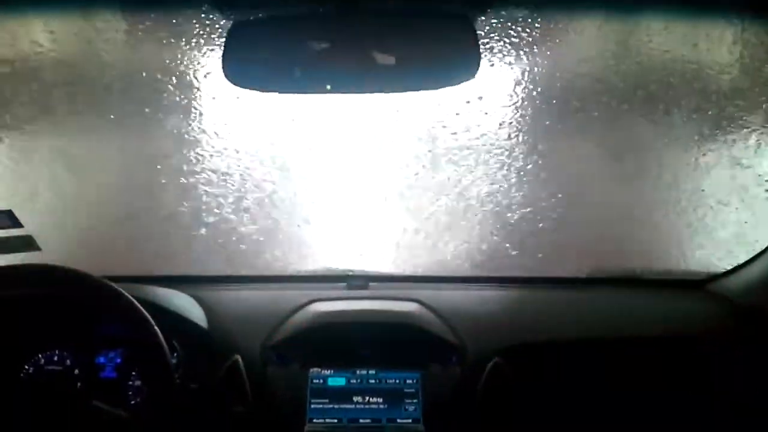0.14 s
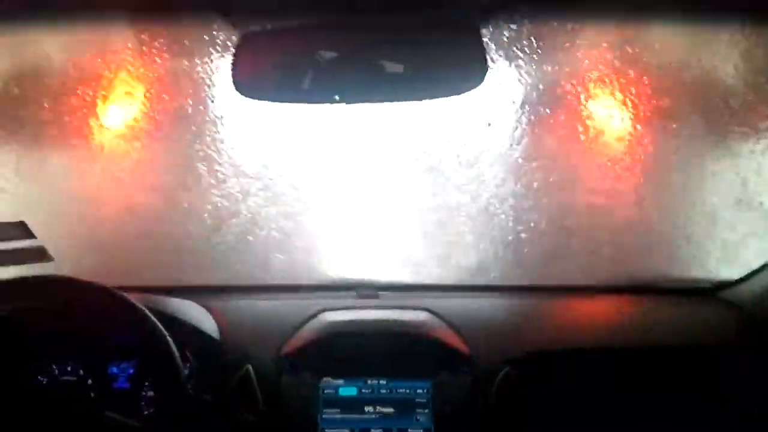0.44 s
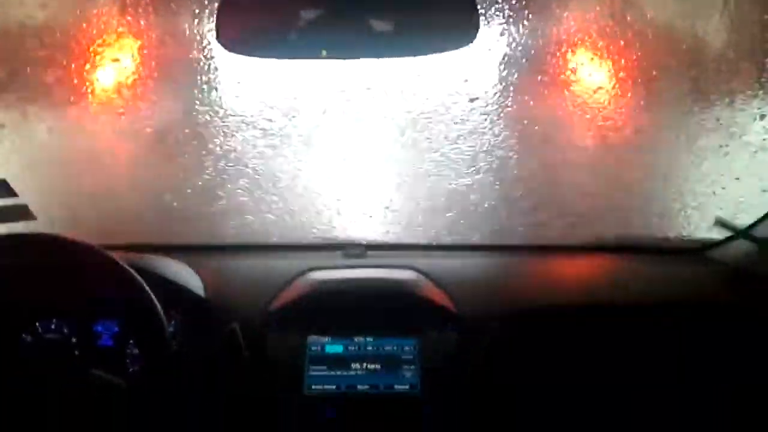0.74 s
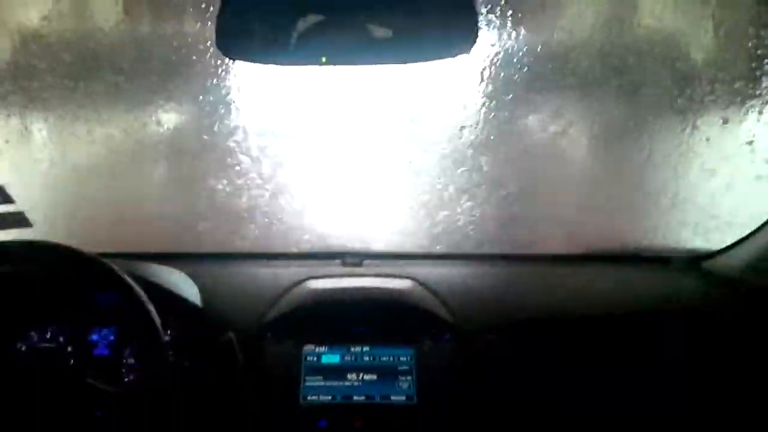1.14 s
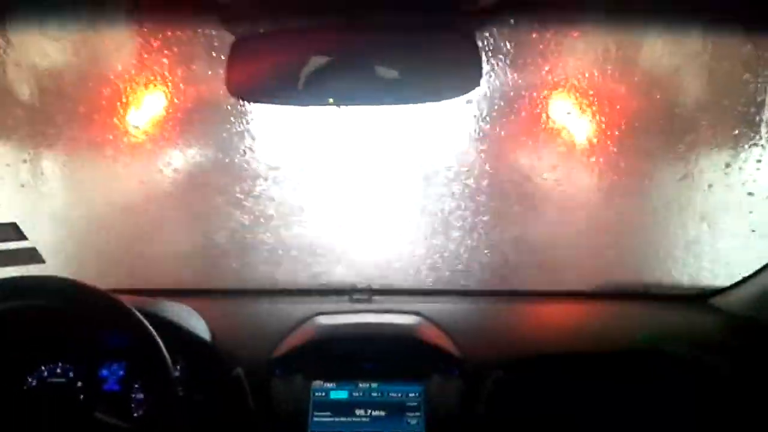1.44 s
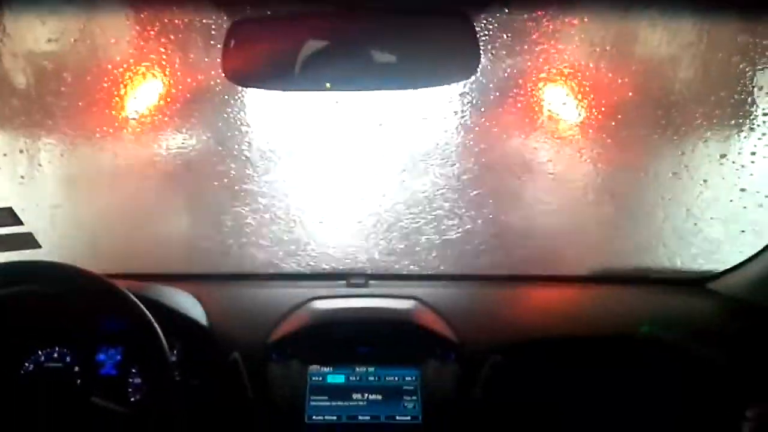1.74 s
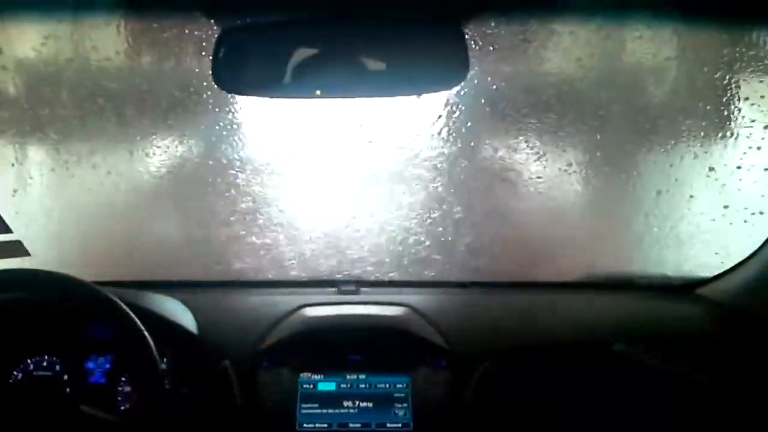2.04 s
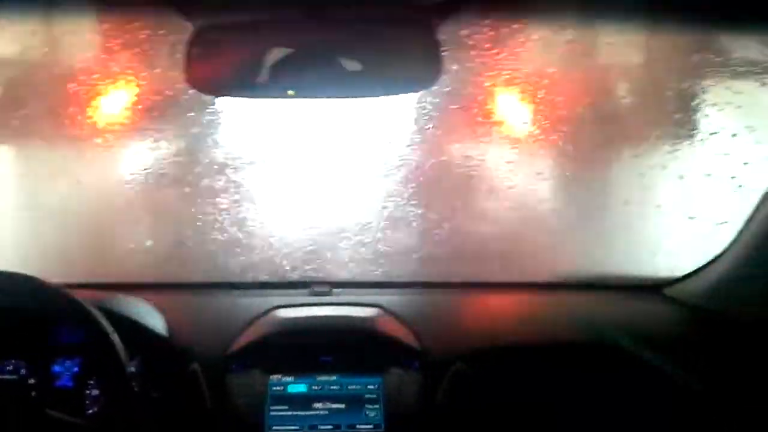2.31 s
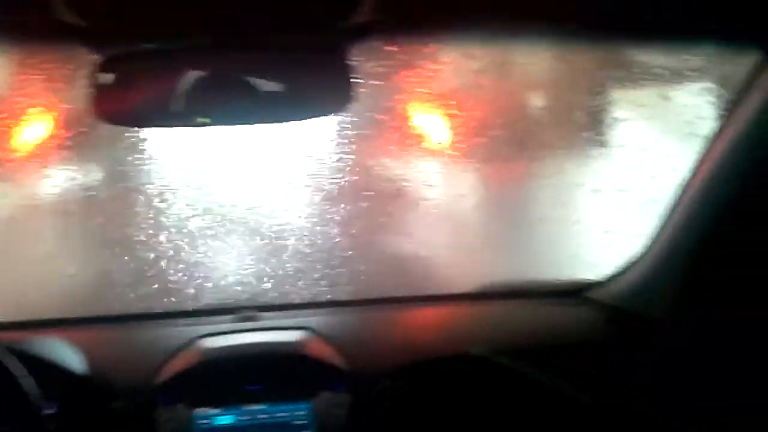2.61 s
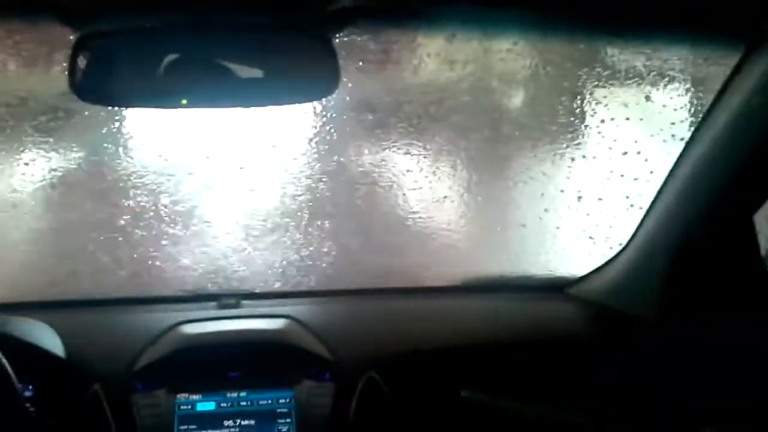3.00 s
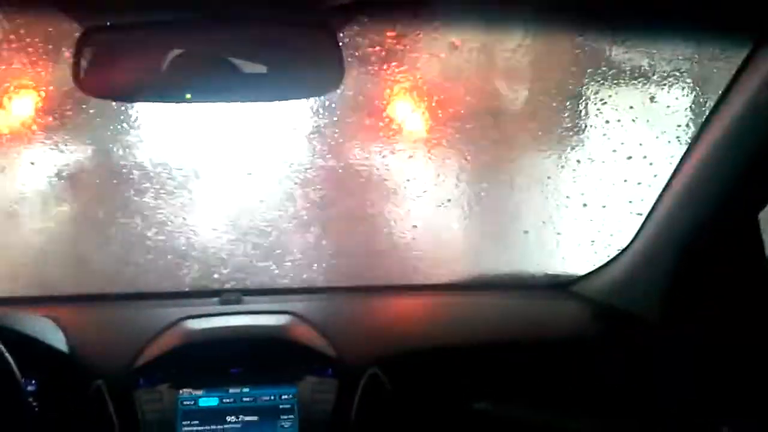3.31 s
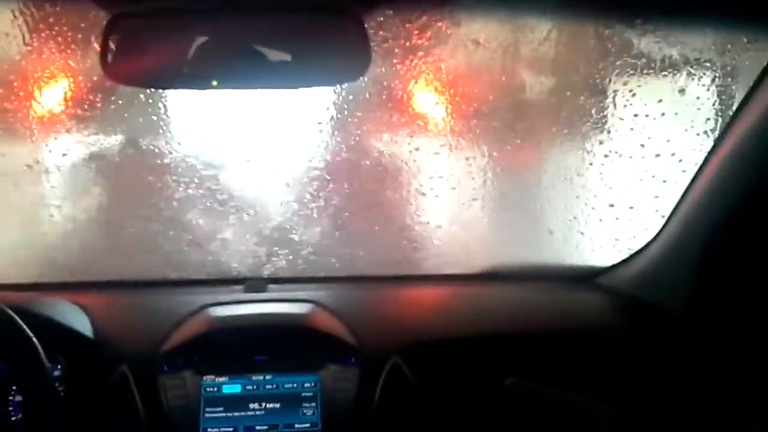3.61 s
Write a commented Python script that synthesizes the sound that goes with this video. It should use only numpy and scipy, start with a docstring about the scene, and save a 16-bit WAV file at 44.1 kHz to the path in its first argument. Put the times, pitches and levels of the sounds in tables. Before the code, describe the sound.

Steady wash water pounding a car's glass and panels, heard inside, with a few cracking snaps

```python
"""Inside a closed car in an automatic wash. From the start thousands of random drops a second
ring the panels (drumming), the glass (fizz) and the roof (patter), each through its own spectrum.
Heavier sheets of water swell these layers from the first moments, and slugs of water boom single panels.
From about 1.6 s a few sharp snaps sound close by: cracks, rattling noise bursts and ringing trim.
The last snap overloads a small microphone; gain control dips just after the loudest sounds."""
import sys
import numpy as np
from scipy import signal
from scipy.io import wavfile
from scipy.ndimage import uniform_filter1d, map_coordinates

SR = 44100
rng = np.random.default_rng(int(sys.argv[2]) if len(sys.argv) > 2 else 0)


def materialize(psi):
    """Save the field psi as 16-bit PCM at rate SR to the path in sys.argv[1].

    A 1-D psi becomes a single channel; in a 2-D psi each row is a channel.
    """
    bounded = np.clip(np.atleast_2d(psi).T, -1, 1)
    quanta = np.round(bounded * 32767).astype(np.int16)
    wavfile.write(sys.argv[1], SR, quanta)


N = 165375


def gain_of(db):
    """Logarithmic level: 20 dB is a factor of ten in amplitude."""
    return 10 ** (np.asarray(db) / 20)


def evened(x):
    """Normalisation by energy: scales a signal to rms 1."""
    return x / np.sqrt(np.mean(x ** 2) + 1e-20)


def lean(hz, treble_db, body_db):
    """Spectral tilt: extra dB per octave going up and going down from a pivot."""
    pivot_hz = 4000
    octaves = np.log2(hz / pivot_hz)
    return treble_db * np.maximum(octaves, 0) + body_db * np.maximum(-octaves, 0)


def colour(x, points, treble_db=0, body_db=0):
    """Minimum-phase filtering: the Hilbert transform of the log gain gives the phase of a causal filter."""
    hz = abs(np.fft.fftfreq(8192, 1 / SR)) + 1
    f, db = np.transpose(points)
    octaves_outside = np.maximum(np.log2(f[0] / hz), 0) + np.maximum(np.log2(hz / f[-1]), 0)
    db = np.interp(np.log(hz), np.log(f), db)
    db = db - 36 * octaves_outside + lean(hz, treble_db, body_db)  # steep fall outside the table
    log_gain = np.maximum(db, -100) * np.log(10) / 20
    taps = np.fft.ifft(np.exp(np.conj(signal.hilbert(log_gain)))).real[:4096]
    return signal.oaconvolve(x, taps)[:len(x)]


def flicker():
    """Low-passed noise: two moving averages leave a quick random wavering of rms 1."""
    size = round(0.04 * SR)  # 40 ms
    noise = rng.standard_normal(N)
    return evened(uniform_filter1d(uniform_filter1d(noise, size), size))


def force(spray_column, sheet_column, sheet_offset_db=0):
    """Incoherent addition: steady spray and sheets that rise fast and drain exponentially sum in power."""
    # force of the spray: time_s, drumming_db, fizz_db, patter_db
    spray = [(0.0, -28, -26, -29), (0.15, -21.5, -28, -28), (0.32, -26, -30, -31),
             (0.46, -25.5, -29.5, -30.5), (1.09, -23.5, -29.5, -30), (1.33, -24.5, -29.5, -31.5),
             (1.45, -25.5, -29.5, -31), (1.69, -24.5, -28.5, -29.5), (2.03, -26, -29, -29.5),
             (2.58, -24.5, -30, -30.5), (2.87, -25.5, -30.5, -29.5), (3.09, -24.5, -27, -27),
             (3.47, -24.5, -31, -30.5), (3.75, -23, -28.5, -26.5)]
    # sheets of water, levels before the offset: start_s, drumming_db, fizz_db, t60_s
    sheets = [(0.054, -16.5, -20, 0.26), (0.091, -21, -33, 0.45), (0.225, -19.5, -24, 0.21),
              (0.891, -27, -25, .4), (0.932, -21, -28.5, 0.37), (0.998, -21, -26.5, 0.35),
              (1.329, -26, -27.5, 0.23), (1.546, -19, -25, 0.45), (1.584, -19.5, -22, 0.4),
              (2.164, -19.5, -25, 0.23), (2.6, -29.5, -30, .3), (2.874, -22, -24, .3),
              (3.419, -25, -26, .3)]
    rise_s = 0.0046
    t = np.arange(N) / SR
    spray = np.array(spray)
    power = gain_of(2 * np.interp(t, spray[:, 0], spray[:, spray_column]))  # doubled dB gives power
    for sheet in sheets:
        age = np.maximum(t - sheet[0], 0)
        level_db = sheet[sheet_column] + sheet_offset_db - 60 * age / sheet[3]
        power = power + np.minimum(age / rise_s, 1) ** 2 * gain_of(2 * level_db)
    return np.sqrt(power)


def patchy(x):
    """Time-frequency modulation: the spray wanders over the car, so patches of spectrum swell and fade."""
    patch_db, patch_s, patch_octaves = 0.77, 0.04, 0.2
    hz, t, spectrum = signal.stft(x, SR, nperseg=1024, noverlap=768)
    octave = np.log2(np.maximum(hz, 40) / 40)
    grid = rng.standard_normal((200, 400))
    where = np.meshgrid(octave / patch_octaves, t / patch_s, indexing="ij")
    field = evened(map_coordinates(grid, where, order=3, mode="mirror"))
    patched = signal.istft(spectrum * gain_of(patch_db * field), SR, nperseg=1024, noverlap=768)[1]
    return evened(patched[:len(x)])


def drops(per_s, spread_db, t60, tone, level):
    """Shot noise: random drops of uneven size excite spots that each ring in their own way in the cabin."""
    spots = 16
    lead = 4096  # samples run ahead, so that the ringing is already under way at time zero
    size = gain_of(spread_db * np.minimum(rng.exponential(1, N + lead), 5))
    sign = rng.choice([-1., 1.], N + lead)
    hits = size * sign * (rng.random(N + lead) < per_s / SR)
    t = np.arange(lead) / SR
    ring = rng.standard_normal((spots, lead)) * gain_of(-60 * t / t60)
    spot = rng.integers(0, spots, N + lead)
    wet = sum(signal.oaconvolve(hits * (spot == k), ring[k])[:N + lead] for k in range(spots))
    wet = wet * np.concatenate([np.full(lead, level[0]), level])
    return evened(patchy(colour(wet, tone))[lead:]) * np.sqrt(np.mean(level ** 2))


def drumming_panels(gusts):
    """Forced resonance: drops drum the body panels, heard in the low frequencies."""
    # spectrum of the panels: freq_hz, density_db_per_hz
    panels = [(20, -41), (45, -30), (70, -17.5), (92, -20), (128, -7), (152, -10), (200, -4), (235, -2.5),
              (272, 0.5), (340, -4), (400, -9), (465, -8), (520, -14), (600, -27)]
    level = force(1, 1) * gain_of(0.6 * gusts)  # flicker of 0.6 dB rms
    return drops(per_s=2500, spread_db=3, t60=0.084, tone=panels, level=level)


def fizzing_glass(gusts):
    """Forced resonance: dense drops fizz on the glass, heard in the treble."""
    # spectrum of the glass: freq_hz, density_db_per_hz
    glass = [(1200, -12), (1600, -8.5), (2100, -7.5), (2600, -7.5), (3100, -6.5), (3600, -6), (3900, -3.5),
             (4250, -1), (4700, 0), (5050, -7.5), (5700, -14), (6200, -17), (7500, -24), (9000, -31),
             (10000, -39.5), (11000, -45)]
    level = force(2, 2) * gain_of(1 * gusts)  # flicker of 1 dB rms
    return drops(per_s=4000, spread_db=3, t60=0.061, tone=glass, level=level)


def pattering_roof(gusts):
    """Forced resonance: drops patter on the roof, heard in the middle frequencies."""
    # spectrum of the roof: freq_hz, density_db_per_hz
    roof = [(400, -15), (520, -4.5), (600, -1), (705, 0.5), (820, -3), (1050, -2), (1300, -8), (2000, -16),
            (3000, -39)]
    level = force(3, 1, sheet_offset_db=-5.5) * gain_of(0.75 * gusts)  # sheets follow the drumming
    return drops(per_s=2500, spread_db=2.5, t60=0.051, tone=roof, level=level)


def thuds():
    """Damped oscillation: a slug of water sets one panel booming at its own pitch."""
    # dull thuds of single panels: start_s, peak_db, pitch_hz
    thud_table = [(0.085, -18, 481), (0.178, -18.5, 274), (0.549, -19.5, 302), (0.932, -16, 340),
                  (0.99, -23, 481), (1.004, -15, 275), (1.215, -21, 286), (1.261, -17.5, 262),
                  (1.364, -24, 450), (2.459, -18.5, 265)]
    rise_s, t60_s = 0.012, 0.11
    out, t = np.zeros(N), np.arange(8000) / SR
    for (start_s, peak_db, pitch_hz), turn in zip(thud_table, rng.random(len(thud_table))):
        rise = np.sin(np.pi / 2 * np.minimum(t / rise_s, 1))
        decay = gain_of(peak_db - 60 * np.maximum(t - rise_s, 0) / t60_s)
        part = out[round(start_s * SR):][:len(t)]  # a view: adding to it fills out
        part += rise * decay * np.sin(2 * np.pi * (turn + pitch_hz * t))
    return out


def snaps():
    """Impulsive excitation: a crack, a rattling burst dying in the small cabin, and modes of the struck trim."""
    # snaps: start_s, level_db, rise_s, hold_s, t60_s, treble_db_per_octave, body_db_per_octave,
    # crack_db and ring_db (both relative to level_db), pitch_ratio
    snap_table = [(1.5862, -18, 0.0011, 0.0066, 0.07, 2, 3, 0.5, -7.5, 1.05),
                  (3.009, -12.5, .0003, 0.0094, 0.092, -0.8, 0.8, 0, -7, .92),
                  (3.1417, -13, 0.00042, 0.0019, 0.072, -0.8, -2.5, 4, -2, 1.02),
                  (3.559, -14, 0.0042, 0.004, 0.069, -5.5, 1.5, -13, -2, .95),
                  (3.6072, -3, 0.00082, 0.0067, 0.088, 2, 3, -10, -4.5, 0.96)]
    # spectrum of the burst before each snap's tilt: freq_hz, density_db_per_hz
    snap_tone = [(300, -28), (500, -22), (1200, -16), (1500, -17.5), (2600, -8), (3400, -5.5), (4360, -1.5),
                 (5030, -4), (5640, -6.5), (7840, -21), (10000, -28.5), (14300, -25), (14800, -41)]
    # modes of the trim before each snap's ratio, tilt and spread: pitch_hz, level_db, t60_s
    trim = [(720, -12.5, 0.05), (920, -10, 0.052), (1143, 0, 0.046), (1828, -6, 0.042), (2558, -3.5, 0.043),
            (3090, -12, .04), (3530, -2.5, 0.056), (4128, 1, 0.087), (4620, 5, .06), (4670, 3, 0.064),
            (5370, -2, .05)]
    crack_s, mode_spread_db = 0.00087, 2
    rattle_db, rattle_step_s, rattle_fade_in_s = 2.5, 0.001207, 0.011
    out, t = np.zeros(N), np.arange(6000) / SR
    for start_s, level_db, rise_s, hold_s, t60_s, treble_db, body_db, crack_db, ring_db, ratio in snap_table:
        noise = rng.standard_normal(len(t) + len(trim))
        steps = rng.standard_normal(len(t))
        rise = np.minimum(t / rise_s, 1)
        decay = gain_of(-60 * np.maximum(t - hold_s, 0) / t60_s)
        wobble = np.interp(t / rattle_step_s, np.arange(len(t)), steps)
        rattle = gain_of(rattle_db * np.minimum(t / rattle_fade_in_s, 1) * wobble)
        crack = gain_of(crack_db) * np.exp(-t / crack_s)
        hiss = evened(colour(noise, snap_tone, treble_db, body_db))[:len(t)]
        burst = (rise * decay * rattle + crack) * hiss
        modes = np.zeros(len(t))
        for (hz, mode_db, mode_t60_s), v in zip(trim, noise[len(t):]):
            start_db = mode_db + mode_spread_db * v + lean(hz, treble_db, body_db)
            modes += gain_of(start_db - 60 * t / mode_t60_s) * np.sin(2 * np.pi * hz * ratio * t)
        snap = gain_of(level_db) * (burst + gain_of(ring_db) * rise * modes)
        part = out[round(start_s * SR):][:len(t)]
        part += snap[:len(part)]
    return out


def scene():
    """Superposition: the layers of water share one flicker and add to the thuds and snaps."""
    gusts = flicker()
    water = drumming_panels(gusts) + fizzing_glass(gusts) + pattering_roof(gusts)
    return (water + thuds() + snaps())[None]


def record(dry):
    """Non-linear transfer: hard overload, gain control dipping just after the loudest sounds, band limit."""
    clip, edge_hz = 0.99, 15542
    duck_from_db, duck_share, recovery_db_per_s = -12, 0.46, 65  # recovery of the followed level
    window = 441  # samples: 10 ms
    mean = np.ones(window) / window
    flat = np.clip(dry, -clip, clip)
    power_db = 10 * np.log10(abs(signal.lfilter(mean, 1, flat[0] ** 2)) + 1e-12)
    # the running maximum of level plus fall holds each peak and lets it sink steadily
    fall = np.arange(N) * recovery_db_per_s / SR
    held_db = np.maximum.accumulate(power_db + fall) - fall
    over_db = np.maximum(held_db - duck_from_db, 0)
    late_db = np.concatenate([np.zeros(window), over_db])[:N]
    ducked = flat / gain_of(duck_share * signal.lfilter(mean, 1, late_db))
    low_pass = signal.firwin(511, edge_hz, window=("kaiser", 9), fs=SR)
    return signal.oaconvolve(ducked, low_pass[None], "same")


dry = scene()
out = record(dry)
materialize(out)
```